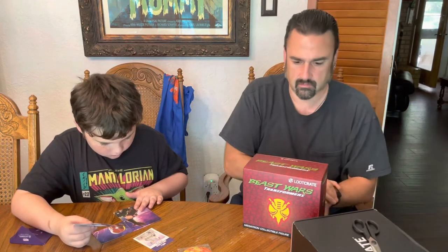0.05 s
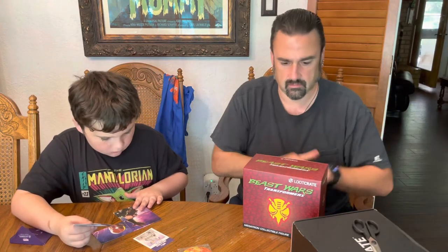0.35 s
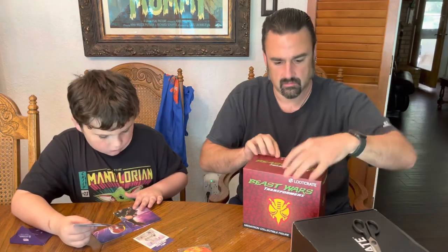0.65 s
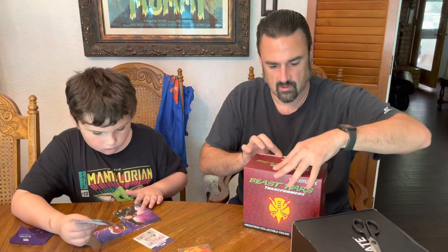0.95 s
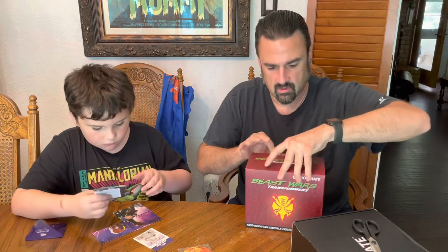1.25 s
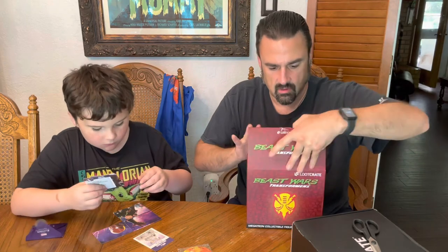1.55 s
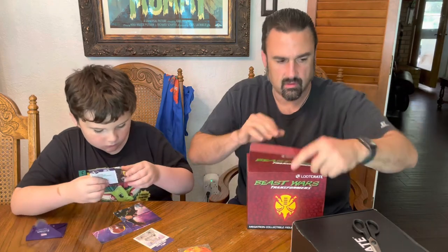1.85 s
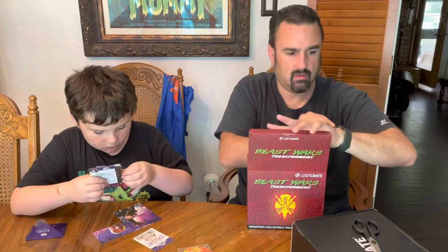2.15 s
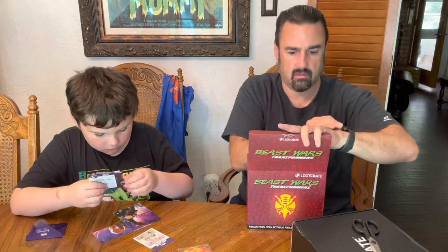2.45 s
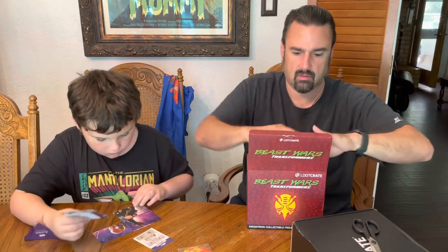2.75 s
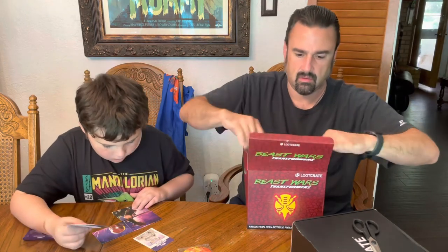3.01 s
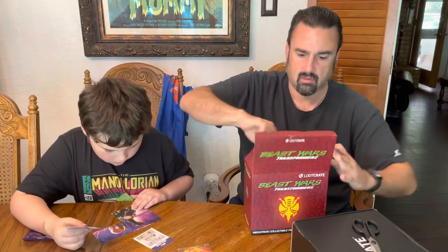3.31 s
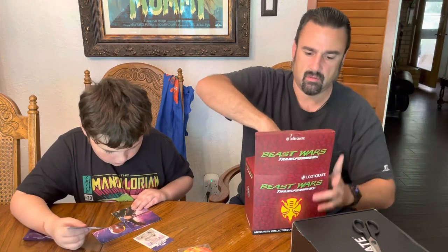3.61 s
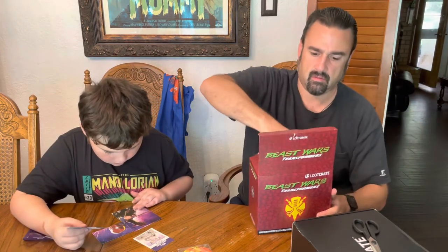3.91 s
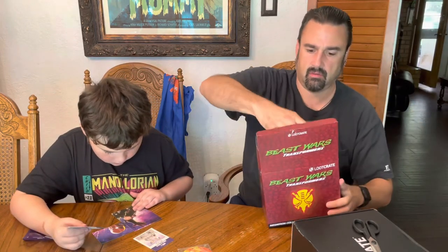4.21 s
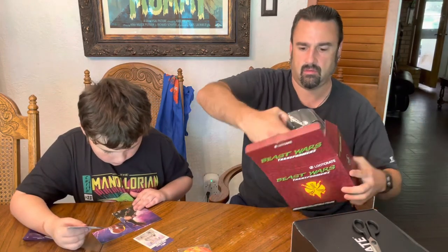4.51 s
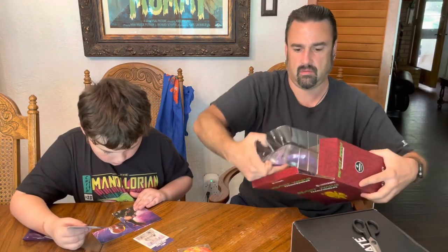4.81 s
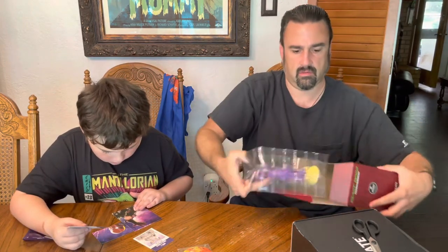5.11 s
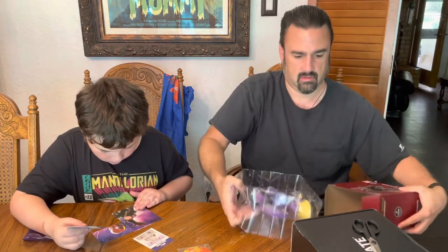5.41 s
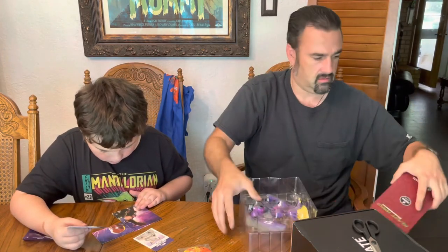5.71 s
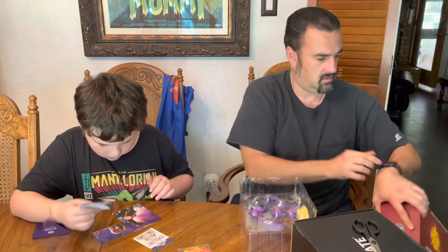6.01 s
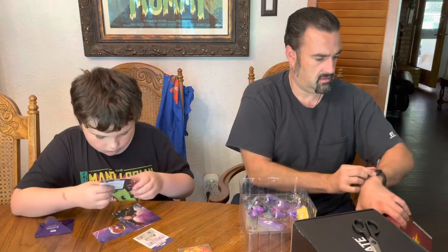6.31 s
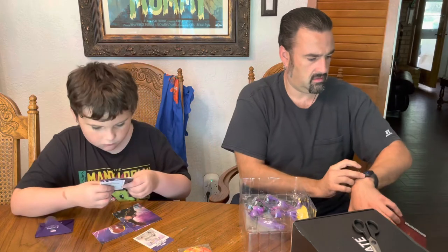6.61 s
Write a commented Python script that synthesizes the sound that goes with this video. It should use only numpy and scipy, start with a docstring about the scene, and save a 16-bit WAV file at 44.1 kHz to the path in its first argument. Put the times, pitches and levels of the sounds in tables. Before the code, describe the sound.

Cardboard rubs, pops open and scrapes as a plastic tray is pulled out and set down in a small room.

```python
"""A soft bump sounds over a faint house rumble, then fingers brush and open a cardboard box on a wooden
table, drag out a thin plastic tray and set it down. Rubbing is many tiny slips: surfaces catch and let go.
Knocks ring the hollow box and the table, flaps and tray crackle as they buckle, tight card squeaks,
the wedged tray sings, and a piece of metal rings faintly after the lid pops.
It is all heard in a small, echoing room, through a phone a metre or two away."""
import sys
import numpy as np
from scipy import signal
from scipy.fft import rfft, irfft, next_fast_len
from scipy.io import wavfile
from scipy.ndimage import uniform_filter1d

SR = 44100
rng = np.random.default_rng(int(sys.argv[2]) if len(sys.argv) > 2 else 0)


def wav_record(signal):
    """Record a signal, one row per channel, as 16-bit PCM in the file named by sys.argv[1]."""
    frames = np.transpose(np.atleast_2d(signal))
    bounded = np.clip(frames, -1, 1)
    # unit amplitude maps onto the largest positive 16-bit level
    quanta = np.round(bounded * 32767).astype(np.int16)
    wavfile.write(sys.argv[1], SR, quanta)


N = 298027
TIME = np.arange(N) / SR
HIT_TIME = TIME[:SR // 4]  # the clock of one short sound
LID_OPEN_S, TRAY_OUT_S = 1.2, 5.3

# soft bumps as the box is nudged and its lid pulls free: t/s, f/Hz, level/dB, length/ms
BUMPS = [(0.085, 128, -51, 84), (1.367, 170, -37, 35), (1.384, 281, -34.5, 33)]
# a hand brushes the card: middle t/s, half length/s, level/dB
BRUSHES = [(0.285, 0.053, -61.5), (2.282, 0.099, -46), (2.542, 0.04, -54.5), (5.96, 0.14, -51),
           (6.397, 0.043, -58.5), (6.532, 0.04, -62.5)]
# sliding strokes on lid, inner flaps, tray and table; the levels are reached at the stroke's end:
# t/s, length/s, scrape level/dB, hiss level/dB, drumming level/dB, swell/dB (below 0 it fades)
STROKES = [ (0.509, 0.49, -44.5, -60.5, -45.5, 5.5), (1.029, 0.13, -51, -63, -49.5, 3),
           (1.198, 0.11, -56.5, -59.5, -44, -8), (1.36, 0.021, -47, -42.5, -40, -5),
           (1.493, 0.13, -59, -55, -91, 10), (1.665, 0.13, -47, -57, -49.5, 2),
           (1.868, 0.25, -61, -64.5, -59.5, -5.5), (2.59, 0.17, -55.5, -53.5, -56.5, 10.5),
           (2.765, 0.18, -50.5, -57.5, -46, -2.5), (2.931, 0.13, -44, -55, -50.5, 24),
           (3.089, 0.099, -50, -57.5, -45, -1), (3.244, 0.14, -48, -54, -47.5, 2),
           (3.46, 0.12, -49, -53, -44.5, 0.5), (3.627, 0.21, -38, -40, -34.5, 13),
           (3.873, 0.11, -47, -51, -44.5, -8.5), (4.074, 0.16, -43, -47.5, -46, -4),
           (4.299, 0.23, -45, -53, -41.5, 1.5), (4.563, 0.27, -40, -45, -41, 5.5),
           (4.948, 0.15, -32.5, -33.5, -31.5, 18.5), (5.095, 0.094, -47.5, -75, -35.5, 4),
           (5.351, 0.14, -44, -51.5, -44, 1.5), (5.522, 0.044, -47, -44, -32.5, -3.5),
           (5.637, 0.068, -37, -42, -37.5, 5)]
# blunt knocks on the box: t/s, box level/dB, table level/dB, contact time/ms
KNOCKS = [(0.98, -35, -39.5, 9.3), (1.2125, -38.5, -42, 7.7), (1.326, -29, -31, 6.2),
          (1.375, -20.5, -27, 5.9), (1.656, -32.5, -35.5, 8.8), (1.794, -32, -42, 2.5),
          (2.775, -29.5, -36, 1.1), (2.812, -32, -37, 11), (3.117, -32.5, -34, 3.3),
          (3.328, -32, -36.5, 9.5), (3.373, -33, -48, 1.6), (3.438, -28.5, -34, 1.3), (3.537, -33, -33, 26),
          (3.884, -23, -39.5, 5.7), (4.461, -37.5, -33, 3.4), (4.582, -33.5, -40, 2.7),
          (5.39, -21, -35.5, 1.6), (5.517, -15, -45, 0.79), (5.566, -27, -47, 5.9),
          (5.69, -16.5, -31, 2.07), (6.165, -44, -40.5, 8.6)]
# flaps and tray buckle: t/s, crack level/dB, bright snap level/dB, crumple time/ms, fold f/Hz
CRACKS = [(1.321, -32, -29, 6.5, 3020), (1.366, -25, -42, 9.3, 1500), (1.769, -37, -50, 11, 2400),
          (3.107, -37.5, -55, 2.6, 1390), (3.438, -31, -53, 1.6, 1310), (3.46, -36, -41, 1.6, 1200),
          (3.743, -27, -33.5, 5, 1530), (3.819, -35.5, -23, 3.6, 1600), (3.871, -20.5, -35, 3.3, 1620),
          (4.313, -31.5, -52, 1.7, 1220), (4.327, -25, -42, 1.9, 1150), (4.374, -40.5, -37.5, 12, 3000),
          (4.429, -33, -45, 0.45, 1280), (4.485, -32, -54, 4.3, 1220), (4.832, -38.5, -48, 2.3, 3240),
          (5.389, -32.5, -41.5, 5.9, 1464), (5.503, -29.5, -41, 3.1, 2800), (5.516, -18.5, -40, 2.1, 2450),
          (5.526, -26, -38, 3, 3470), (5.571, -32, -34.5, 3, 1310), (5.657, -32, -37.5, 4, 3430)]
# the notes of the metal: f/Hz, level/dB, time to fade by 60 dB/s
METAL_NOTES = [(1556, -46.5, 1.2), (4300, -56.5, 2.2)]
# the metal's note swells once more (first row), later the wedged tray sings:
# t/s, f/Hz, level/dB, length/ms
WAVERING_NOTES = [(1.569, 1596, -55, 32), (3.683, 470, -26.5, 39), (3.819, 1600, -39, 110),
                  (3.873, 2883, -35, 24)]
# tight card squeaks: t/s, f/Hz, level/dB, length/ms
SQUEAKS = [(2.019, 2330, -52.5, 94), (2.186, 2500, -46, 29), (2.699, 2240, -36, 5.9),
           (2.753, 2360, -40.5, 8.8), (2.765, 2250, -34.5, 31), (4.735, 2700, -36.5, 28)]
# the plastic ticks: t/s, level/dB
TICKS = [(5.372, -45), (6.065, -43), (6.218, -50.5)]

# modes (pitches a thing rings at) of shut lid, full box, empty box and table: f/Hz, width/Hz, level/dB
LID_MODES = [(330, 110, 4.5), (596, 79, -2.5)]
FULL_BOX_MODES = [(329, 120, -6), (471.4, 130, 5), (513, 100, 5.5), (597, 110, 0.5)]
EMPTY_BOX_MODES = [(486, 46, 4.5), (578, 74, 5.5), (1158, 240, -8.5)]
TABLE_MODES = [(64, 37, 0.5), (122, 24.6, 3), (198.6, 76, -0.5), (268.2, 24, 4)]
# tone colours of the house, skin on card, scraping, hissing edges and cracks: f/Hz, level/dB
HOUSE_TONE = [(25, -15.5), (55, 1.5), (120, 1.5), (200, -6), (400, -17.5), (1500, -34), (2300, -22.5),
              (3200, -42.5)]
SKIN_TONE = [(700, 1), (2600, -5.5), (6500, -14.5), (11000, -22)]
SCRAPE_TONE = [(150, -21), (500, 8), (850, 1.5), (1500, -4), (2200, -5), (5000, -9.5), (7500, -12),
               (15000, -23.5)]
HISS_TONE = [(1500, 14.5), (4000, -5), (6500, 8.5), (10000, 7), (14000, 3.5), (16000, -2)]
CRACK_TONE = [(150, -2.5), (600, 2), (1300, 1.5), (2100, -2), (4000, -5.5), (7000, -15.5), (15000, -26.5)]

# how long the room echoes: f/Hz, time to fade by 60 dB/s
ROOM_FADE = [(500, 0.45), (2000, 0.37), (6000, 0.34), (15000, 0.037)]
# "side" (how the two microphones differ) against "mid" (what they share): f/Hz, level/dB
STEREO_WIDTH = [(100, -16), (250, -13), (450, -8.5), (800, -1.5), (2000, -7), (6000, -4), (8200, -44),
                (10500, -1), (13000, -51.5)]
# how far the right microphone lags the left: f/Hz, phase/radians
RIGHT_LAG = [(1800, 0), (3200, -.8), (5200, -.4), (5700, 1.3), (7000, 1.5), (7800, 3.0), (9400, 3.25),
             (10200, 4.2), (12800, 6.28)]


def undb(db):
    """Turn decibels into a factor to multiply by."""
    return 10 ** (np.asarray(db) / 20)


def unit(x):
    """Scale a signal to an average power of 1."""
    return x / np.sqrt(np.mean(x ** 2))


def on_log_axis(points, hz):
    """Read between (f/Hz, value) points, with every octave equally wide."""
    f, value = np.transpose(points)
    return np.interp(np.log(hz + 1e-9), np.log(f), value)


def colour(x, points):
    """Give a sound a tone colour made of (f/Hz, level/dB) points."""
    size = 2 * next_fast_len(len(x) // 2 + 2048)
    gain = undb(on_log_axis(points, np.fft.rfftfreq(size, 1 / SR)))
    cepstrum = irfft(np.log(gain))
    # fold it in half, so the filter never answers before the sound arrives
    cepstrum[1:size // 2] *= 2
    cepstrum[size // 2 + 1:] = 0
    return irfft(rfft(x, size) * np.exp(rfft(cepstrum)))[:len(x)]


def resonate(x, hz, width):
    """Let through a band around one pitch, so that it rings."""
    return signal.lfilter(*signal.iirpeak(hz, hz / width, fs=SR), x)


def ring(push, modes):
    """A pushed object rings at its modes and gives off little above or below them."""
    body = sum(undb(db) * resonate(push, hz, width) for hz, width, db in modes)
    band = [modes[0][0] * .7, modes[-1][0] * 1.6]
    return signal.sosfilt(signal.butter(3, band, "bandpass", fs=SR, output="sos"), body)


def wander(per_s):
    """A random curve that glides to a new value per_s times a second."""
    step = int(SR / per_s)
    stairs = np.repeat(rng.standard_normal(N // step + 1), step)
    return unit(uniform_filter1d(stairs, step)[:N])


def slips(per_s, spread_db, size=N):
    """Surfaces catch and let go in tiny random clicks, a few much larger than the rest."""
    strength = undb(spread_db * np.minimum(rng.exponential(size=size), 4))
    clicks = strength * rng.standard_normal(size)
    return unit(clicks * (rng.random(size) < per_s / SR))


def burst(ms, per_s):
    """A cluster of slips that swells quickly and dies away."""
    age = HIT_TIME * 1000 / max(ms, .3)
    return np.sqrt(age) * np.exp(-age) * slips(per_s, spread_db=0.97, size=len(HIT_TIME))


def add(track, s, sound, db):
    """Place a sound at s seconds so that its loudest 8 ms have the given level."""
    start = max(int(s * SR), 0)
    loudest = np.sqrt(uniform_filter1d(sound ** 2, size=353).max())
    track[start:start + len(sound)] += (sound * undb(db) / loudest)[:N - start]


def arch(ms):
    """One smooth rise and fall in loudness."""
    return np.sin(np.pi * np.minimum(HIT_TIME * 1000 / ms, 1))


def rasp(hz, ms, width_share=0.34):
    """A quick run of slips swells and fades, ringing broadly around one pitch."""
    run = slips(per_s=5000, spread_db=5)[:len(HIT_TIME)] * arch(ms)
    width = width_share * hz
    return resonate(resonate(run, hz, width), hz, width)


def house_rumble(level_db=-61.5):
    """The house rumbles low, with a faint band of hiss; gives mid and side."""
    mid, side = (unit(colour(rng.standard_normal(N), HOUSE_TONE)) for _ in range(2))
    swell = undb(level_db + 1.5 * wander(5.4))
    return mid * swell, colour(side, STEREO_WIDTH) * swell


def bumps():
    """The nudged box and its lid give soft, low bumps with no sharp edge."""
    out = np.zeros(N)
    for s, hz, db, ms in BUMPS:
        add(out, s, rasp(hz, ms), db)
    return out


def brushing():
    """Skin glides over smooth card: very fine slips swell and fade with each pass."""
    loudness = sum(undb(db) * np.exp(-((TIME - s) / half) ** 2) for s, half, db in BRUSHES)
    return unit(colour(slips(per_s=22000, spread_db=6.0), SKIN_TONE)) * loudness


def stroke(start, length, swell_db, attack_s=0.019, release_s=0.052):
    """One stroke takes hold quickly, swells or fades steadily, then runs out as the hand slows."""
    age = np.maximum(TIME - start, 0)
    attack = np.minimum(age / attack_s, 1)
    swell = undb(swell_db * np.minimum(age / length - 1, 0))
    release = np.exp(-np.maximum(age - length, 0) / release_s)
    return attack * swell * release


def flexing(push):
    """A bent sheet rings at many pitches that come and go as the contact moves; high ones are weaker."""
    return sum(resonate(push, hz, hz / 11) * undb(4.5 * wander(35)) / np.hypot(1, (hz / 4500) ** 2)
               for hz in np.geomspace(650, 6300, num=20))


def rubbing(table_db=-7, lid_db=-1, fingertip_top_hz=3700):
    """Card and plastic slide unevenly: the slips scrape, hiss at the edges and drum on box and table."""
    scrape_level, hiss_level, drum_level = sum(np.outer(undb(levels_db), stroke(s, length, swell_db))
                                               for s, length, *levels_db, swell_db in STROKES)
    grip = undb(1.8 * wander(70))
    friction = grip * slips(per_s=5000, spread_db=2.0)
    scrape = unit(colour(friction / 2 + flexing(friction), SCRAPE_TONE)) * scrape_level
    # soft fingertips on the shut box sound duller than the free edges do later
    dull = signal.sosfilt(signal.butter(2, fingertip_top_hz, fs=SR, output="sos"), scrape)
    scrape = np.where(TIME < LID_OPEN_S, dull, scrape)
    hiss = unit(colour(friction, HISS_TONE)) * hiss_level
    # first the shut lid drums, then the open box, at last the empty one
    lid, full, empty = (unit(ring(friction, m)) for m in (LID_MODES, FULL_BOX_MODES, EMPTY_BOX_MODES))
    walls = np.select([TIME < LID_OPEN_S, TIME < TRAY_OUT_S], [lid * undb(lid_db), full], empty)
    table = unit(ring(friction, TABLE_MODES)) * undb(table_db)
    return scrape + crinkle() * scrape_level + hiss + (walls + table) * drum_level


def knocks(chatter_db=-9, rock_s=.035, rock_db=-12):
    """Each knock thuds through the table and rings the hollow box, whose walls chatter."""
    out = np.zeros(N)
    for s, box_db, table_db, ms in KNOCKS:
        if s < TRAY_OUT_S:  # the full box rocks back and touches once more, softer
            modes, chatter_ms, contacts = FULL_BOX_MODES, 15, [(0, 0), (rock_s, rock_db)]
        else:  # with no tray to calm them, the walls chatter longer
            modes, chatter_ms, contacts = EMPTY_BOX_MODES, 30, [(0, 0)]
        # the grip changes from knock to knock and retunes the walls
        tuning = 1 + .025 * rng.standard_normal()
        walls = [(hz * tuning, width, db) for hz, width, db in modes]
        for delay, softer_db in contacts:
            push = unit(burst(ms, per_s=4500))
            chatter = undb(chatter_db) * unit(burst(chatter_ms, per_s=2800))
            add(out, s + delay, ring(push + chatter, walls), box_db + softer_db)
            add(out, s + delay, ring(push, TABLE_MODES), table_db + softer_db)
    return out


def cracks(fold_db=2):
    """A stiff sheet buckles in a quick run of clicks with a bright snap; each fold has its own pitch."""
    out = np.zeros(N)
    for s, crack_db, snap_db, ms, hz in CRACKS:
        clicks = burst(ms, per_s=6000)
        fold = undb(fold_db) * resonate(clicks, hz, hz / 2)
        add(out, s, colour(clicks + fold, CRACK_TONE), crack_db)
        add(out, s, colour(clicks, HISS_TONE), snap_db)
    return out


def metal(start_s=1.322, beat_hz=11.2):
    """The lid's jolt sets some metal ringing; a weaker twin just above each note makes it throb."""
    age = np.maximum(TIME - start_s, 0)
    out = np.zeros(N)
    for hz, db, fade_s in METAL_NOTES:
        note = np.sin(2 * np.pi * hz * age)
        twin = 0.55 * np.sin(2 * np.pi * (hz + beat_hz) * age)
        out += (note + twin) * undb(db - 60 * age / fade_s)
    return out


def wavering_notes(waver_share=0.019):
    """The metal's note swells once more; later the wedged tray slips and sings short wavering notes."""
    out = np.zeros(N)
    for s, hz, db, ms in WAVERING_NOTES:
        pitch = hz * (1 + waver_share * wander(150)[:len(HIT_TIME)])
        note = np.sin(2 * np.pi * np.cumsum(pitch) / SR)
        add(out, s, note * arch(ms), db)
    return out


def squeaks():
    """Tight card sticks and slips in short, dry squeaks."""
    out = np.zeros(N)
    for s, hz, db, ms in SQUEAKS:
        add(out, s, rasp(hz, ms), db)
    return out


def crinkle(start_s=3.74, wall_hz=1150, against_scrape_db=-3.5):
    """The dragged tray catches on the card in separate small clicks that ring its thin wall."""
    clicks = colour(slips(per_s=170, spread_db=0.5), CRACK_TONE)
    wall = unit(resonate(clicks, wall_hz, width=wall_hz))
    return wall * undb(against_scrape_db) * (TIME > start_s)


def ticks():
    """The thin plastic relaxes in single bright ticks."""
    out = np.zeros(N)
    for s, db in TICKS:
        add(out, s, colour(burst(ms=0.3, per_s=7700), HISS_TONE), db)
    return out


def even_out(echoes):
    """Keep the room's fine peaks and dips, but make every broad band of pitch equally strong."""
    power = uniform_filter1d(np.abs(rfft(echoes)) ** 2, size=71)
    hz = np.fft.rfftfreq(len(echoes), 1 / SR)
    return colour(echoes, np.column_stack([hz, -10 * np.log10(power)])[1:])


def centred(side, mid):
    """Echoes come from all around, so no broad band of pitch leans left or right."""
    side_bands, mid_bands = rfft(side, 2 * len(side)), rfft(mid, 2 * len(mid))
    shared = uniform_filter1d((side_bands * mid_bands.conj()).real, size=401)
    lean = shared / uniform_filter1d(np.abs(mid_bands) ** 2, size=401)
    return irfft(side_bands - lean * mid_bands)[:len(side)]


def room(dry, tail_db, early_db):
    """The direct sound, close echoes from table and wall, then a tail whose treble dies first."""
    t = TIME[:int(.7 * SR)]
    hz, times, frames = signal.stft(rng.standard_normal((2, len(t))), SR, nperseg=256)
    fade = undb(-60 * times / on_log_axis(ROOM_FADE, hz)[:, None])
    tail = signal.istft(frames * fade, SR)[1][:, :len(t)]
    taps = rng.standard_normal(tail.shape) * (rng.random(tail.shape) < 1500 / SR)
    early = taps * np.exp(-t / 0.0046)
    echoes = (undb(tail_db) * unit(tail) + undb(early_db) * unit(early)) / np.sqrt(len(t))
    direct = t == 0  # reaches both microphones alike, so it goes in mid only
    mid = even_out(echoes[0] + direct)
    side = centred(colour(even_out(echoes[1]), STEREO_WIDTH), mid)
    return tuple(signal.fftconvolve(dry, response)[:N] for response in (mid, side))


def scene():
    """All the handling shares one room, over the quiet of the house; gives left and right."""
    handling = (rubbing() + brushing() + knocks() + cracks() + ticks()
                + squeaks() + wavering_notes() + bumps())
    # the handling sounds carry almost nothing below about 48 Hz
    handling = signal.sosfilt(signal.butter(3, 48, "highpass", fs=SR, output="sos"), handling)
    mid, side = np.add(room(handling, tail_db=-2.0, early_db=4.0), house_rumble())
    mid = mid + metal()
    return np.array([mid + side, mid - side])


def record(dry, balance_db=1.1, top_hz=15800):
    """The two microphones are out of step in the treble, the left is a bit louder, and the top is cut."""
    lag = on_log_axis(RIGHT_LAG, np.fft.rfftfreq(N, 1 / SR))
    right = irfft(rfft(dry[1]) * np.exp(-1j * lag), N)
    stereo = np.array([dry[0] * undb(balance_db / 2), right * undb(-balance_db / 2)])
    return signal.sosfilt(signal.ellip(10, .2, 80, top_hz, fs=SR, output="sos"), stereo)


dry = scene()
out = record(dry)
wav_record(out)
```